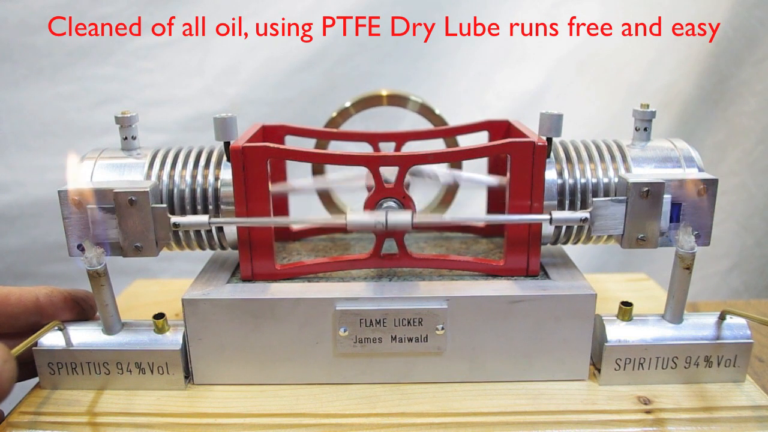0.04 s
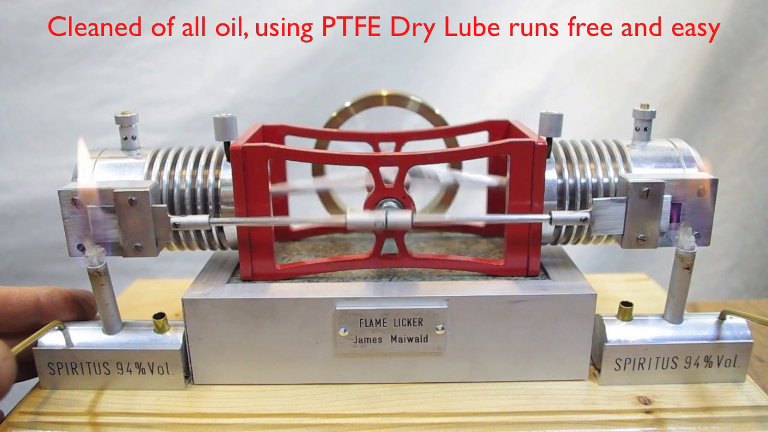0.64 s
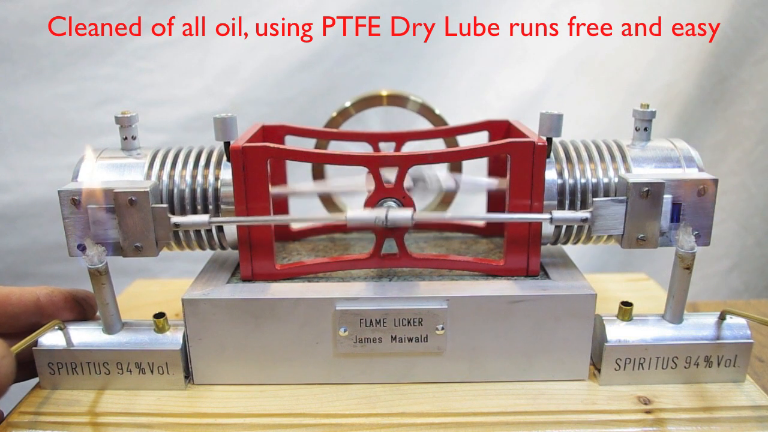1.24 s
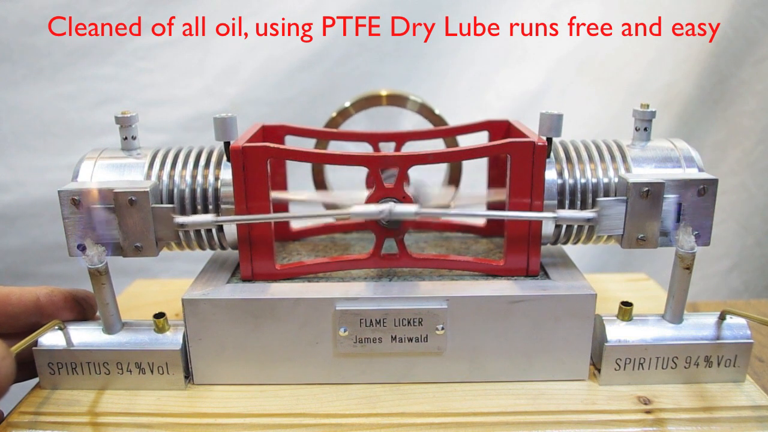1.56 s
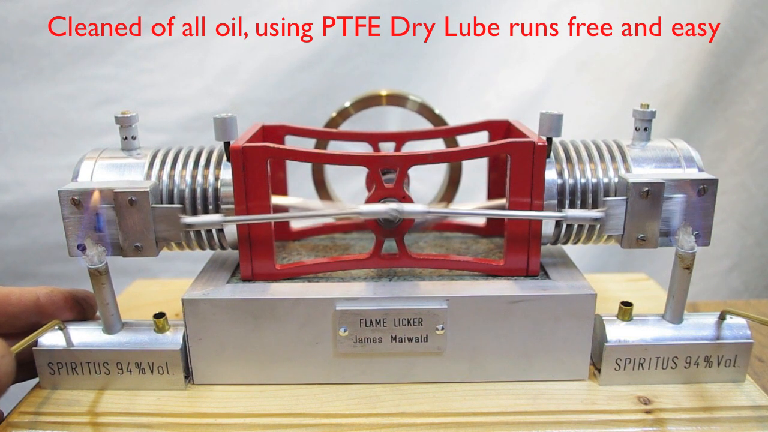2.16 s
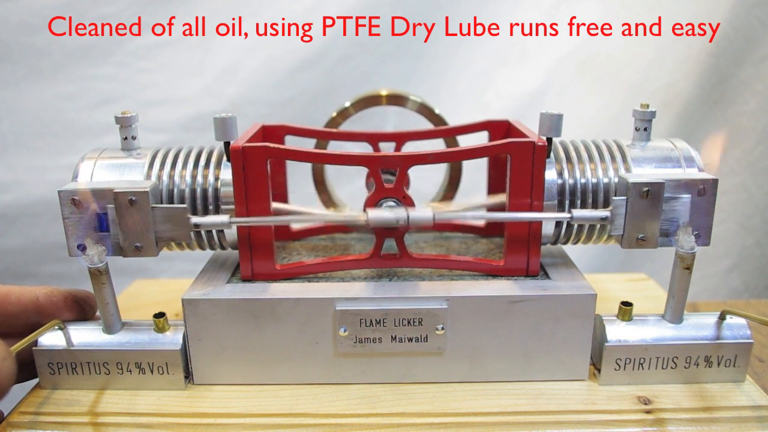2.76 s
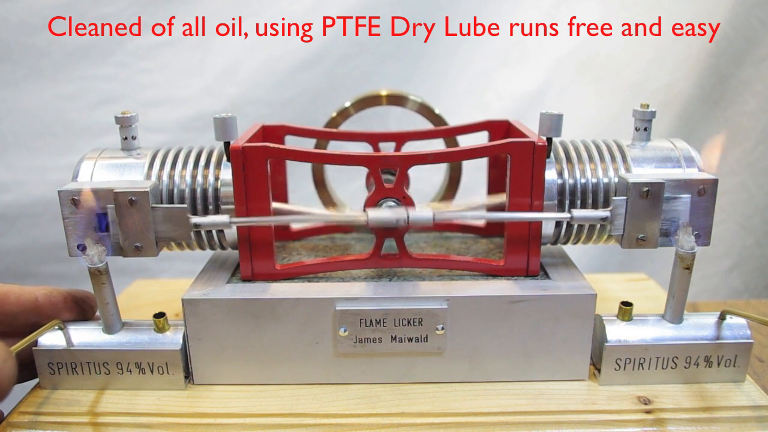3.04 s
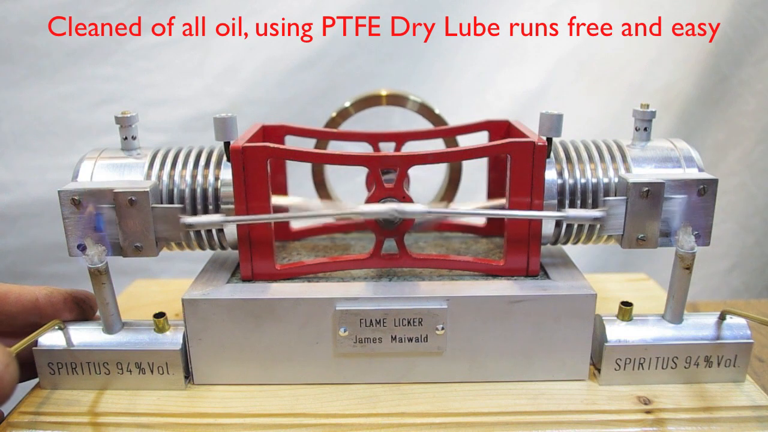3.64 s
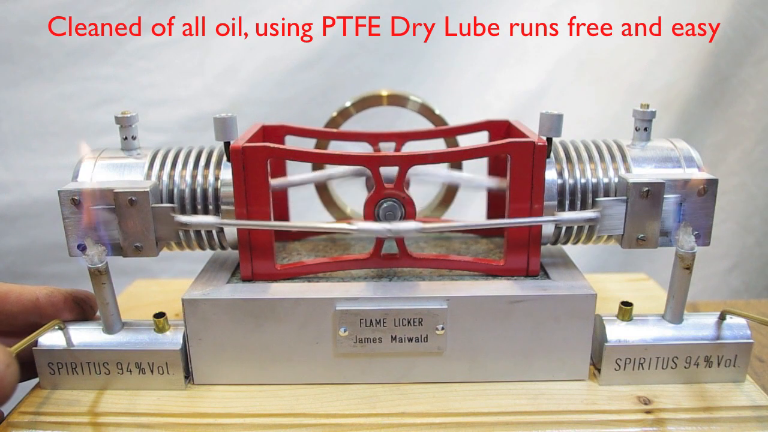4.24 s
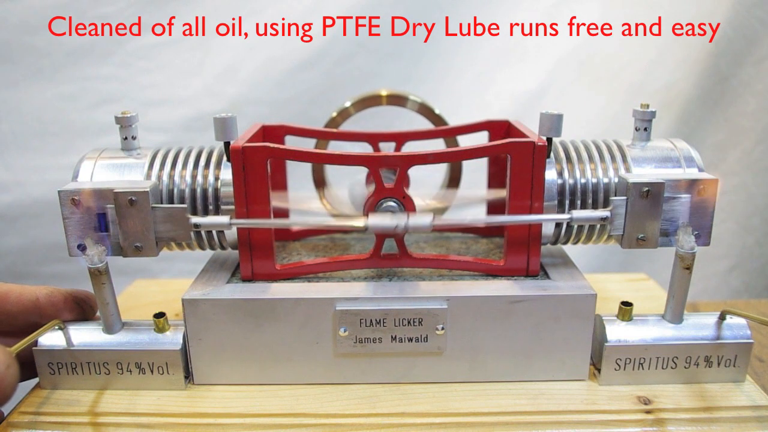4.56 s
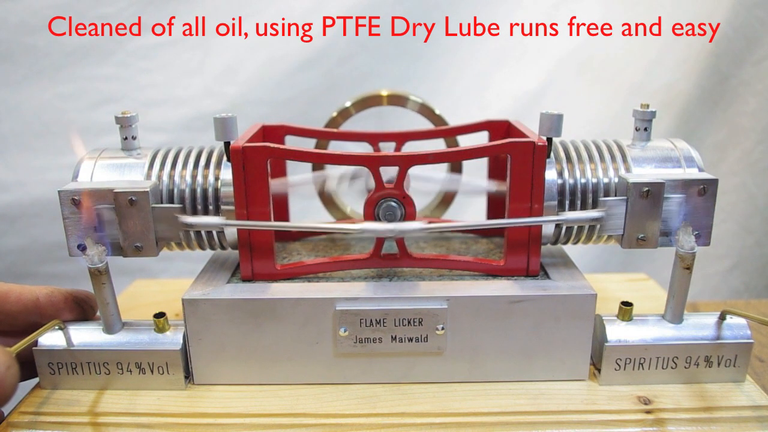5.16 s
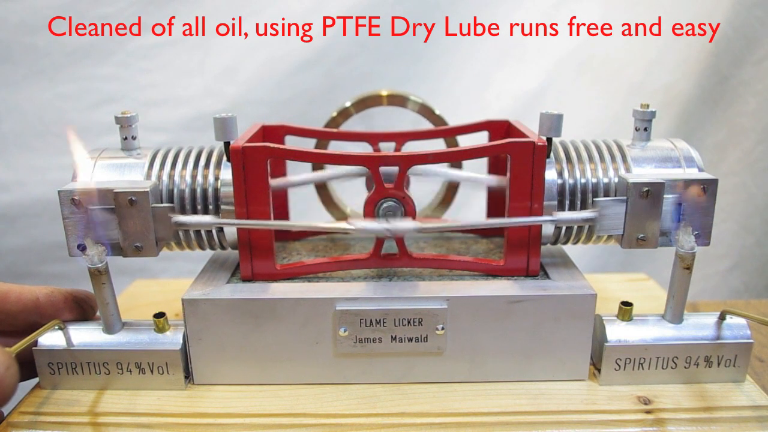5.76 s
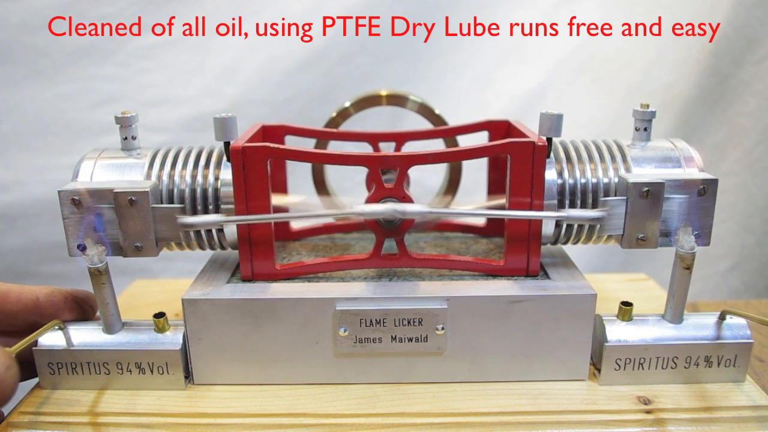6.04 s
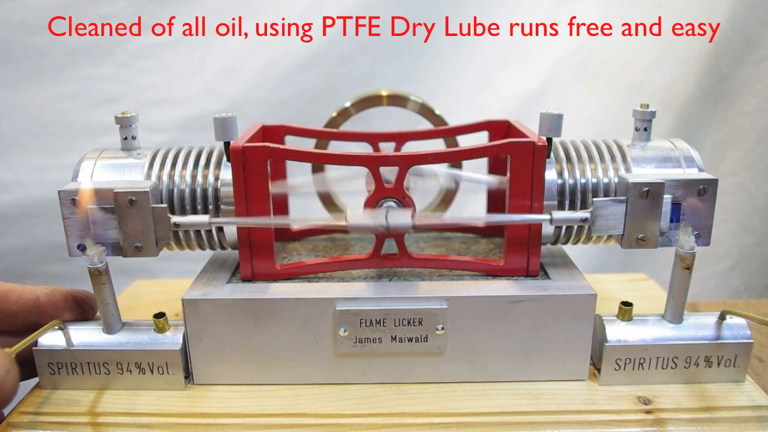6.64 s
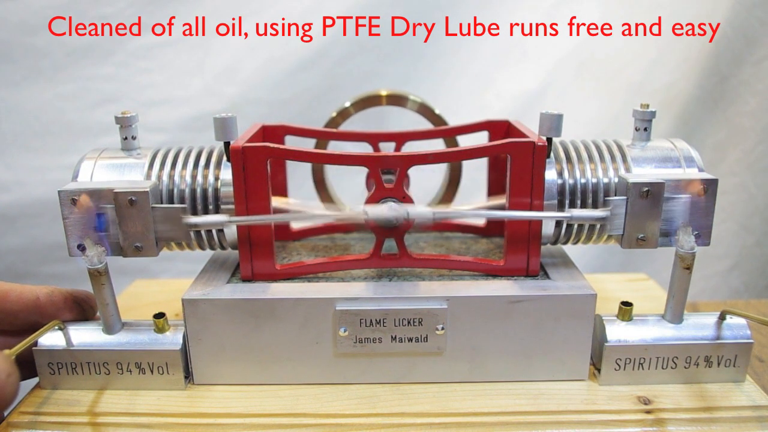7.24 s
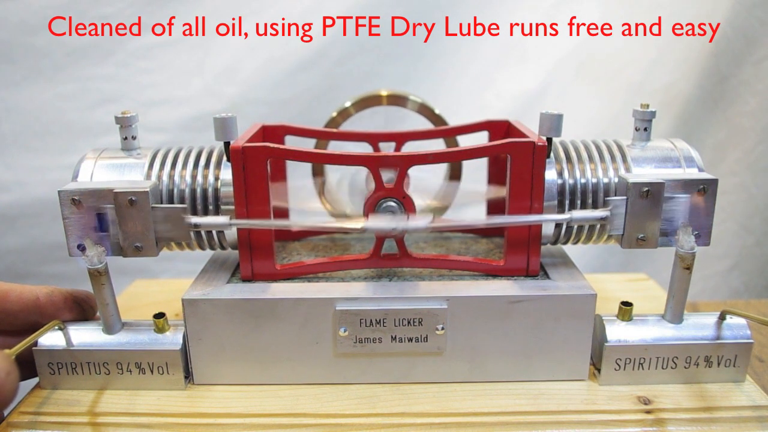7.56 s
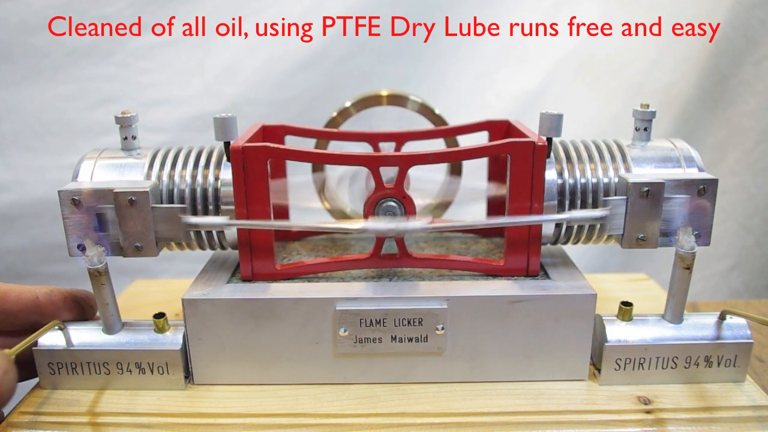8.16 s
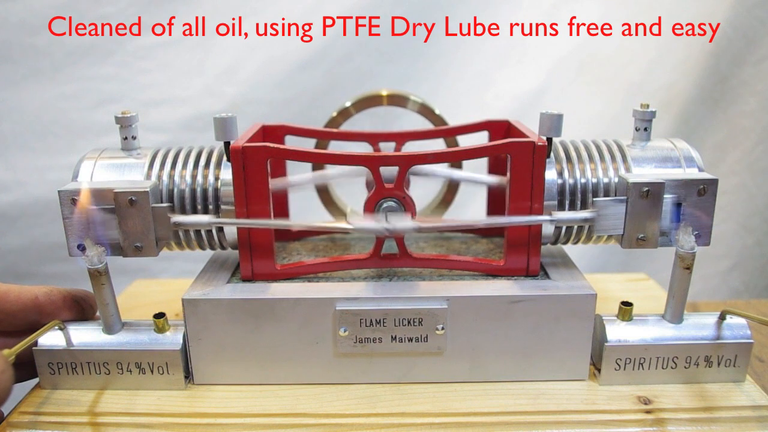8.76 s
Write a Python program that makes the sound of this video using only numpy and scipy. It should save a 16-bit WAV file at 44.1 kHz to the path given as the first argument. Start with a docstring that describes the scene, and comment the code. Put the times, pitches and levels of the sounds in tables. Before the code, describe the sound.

Rapid metal clacks and ticks come from a little flame-driven engine nearby in a small room. While it turns slowly, a dry sliding part chirps once each turn and the wooden board drums softly beneath it. The engine then accelerates to about twice its slowest pace, losing the squeak and gaining a light hollow knock. Soft rubbing and a low, steady rush lie under the clatter.

```python
"""A model flame-licker engine

A two-cylinder engine on a wooden board in a small room speeds up from three to six turns a second.
Valves and linkage clack four times a turn; each impact excites the modes of the metal frame.
Dry sliding parts rub at fixed crank angles, and at low speed one squeaks by stick-slip once a turn.
At higher speed a hollow knock comes just ahead of one clack. Flames and bearings rush underneath."""
import sys
import numpy as np
from scipy import signal
from scipy.fft import rfft, irfft, next_fast_len
from scipy.io import wavfile
from scipy.ndimage import uniform_filter1d

SR = 44100
rng = np.random.default_rng(int(sys.argv[2]) if len(sys.argv) > 2 else 0)


def transcribe(signal):
    """Save signal, clipped to [-1, 1], as a 16-bit WAV file at the path in sys.argv[1]."""
    frames = np.atleast_2d(signal).T
    limited = np.clip(frames, -1, 1)
    pcm = np.round(limited * 32767).astype(np.int16)
    wavfile.write(sys.argv[1], SR, pcm)


N = 387638
TIME = np.arange(N) / SR

# Spectrum of flames and bearings. Each row: frequency in Hz, relative spectral density in dB.
RUSH_SPECTRUM = [(18, -51), (30, -24), (181, 2), (247, 10), (354, 5.5), (965, -5.5), (1100, 0),
                 (1880, -3.5), (3070, -4), (4070, -9.5), (7170, -8), (8160, -3.5), (12000, -22),
                 (13000, -17), (14000, -25)]
# Reverberation of the room. Each row: frequency in Hz, 60 dB decay time in seconds, gain in dB.
ROOM_BANDS = [(101, 0.96, -4), (288, 0.31, -9.5), (1050, 0.57, -7), (2940, 0.15, -12.5),
              (7900, 0.22, -13.5), (14000, 0.19, -14)]
# Speed of the flywheel. Each row: time in seconds, turns per second.
FLYWHEEL_SPEED = [(0.0, 3.7788), (0.691, 3.2931), (1.19, 3.0997), (1.79, 2.9772), (2.615, 3.0968),
                  (3.534, 3.7625), (3.784, 3.702), (4.218, 4.0787), (5.527, 4.7922), (5.888, 5.1671),
                  (6.303, 5.6151), (6.553, 5.5964), (6.802, 5.7923), (7.114, 5.6919), (7.364, 5.9311),
                  (8.243, 6.4621), (8.54, 6.423), (8.79, 6.4827)]
# A turn has four strokes, 0 to 3, with one clack each.
# Each row: time in seconds, then the lag of clacks 0 to 3 behind their quarter turns in strokes.
VALVE_LAG = [(0.0, 0.063, 0.0, 0.163, -0.03), (2.8, 0.055, 0.0, 0.136, 0.109),
             (8.79, -0.05, 0.0, 0.084, -0.001)]
# Sliding contacts, grouped by stroke. Each row: centre after the clack and spread, both in strokes,
# frequency in Hz, bandwidth in Hz, level when slow in dB, level when fast in dB.
SLIDING_CONTACTS = [
    [(0.18, 0.19, 1580, 410, -33, -34.5), (0.15, 0.12, 8500, 2200, -37, -35),
     (0.17, 0.23, 5300, 1600, -47, -46)],
    [(0.86, 0.27, 1118, 190, -46.5, -38.5), (0.69, .6, 702, 30, -51, -51)],
    [(0.44, 0.19, 1557, 190, -36, -32), (0.45, 0.16, 3040, 220, -37, -32),
     (0.45, 0.1, 8400, 880, -34.5, -43), (0.34, 0.17, 5440, 1300, -38, -46)],
    [(0.48, .28, 880, 430, -37.5, -37.5), (0.24, 0.25, 2300, 380, -40, -38.5),
     (0.39, 0.21, 6050, 2300, -40.5, -38)],
]
# Squeaks after clack 2. Each row: time in seconds, delay in strokes, top pitch in Hz, level in dB.
SQUEAK_COURSE = [(0.2, 0.41, 2840, -30), (0.8, 0.49, 2820, -30), (1.1, 0.46, 2910, -18.5),
                 (1.45, 0.52, 3084, -16.5), (2.45, 0.53, 3135, -15), (3.05, 0.54, 3090, -23.5),
                 (3.6, 0.42, 2845, -28), (5.05, 0.37, 2930, -30), (5.9, 0.4, 3050, -41)]
# Contour of one squeak. Each row: turns from its peak, pitch ratio, relative level in dB.
SQUEAK_CONTOUR = [(-.095, .86, -30), (-.068, .87, -16), (-.048, .875, -11), (-.038, .89, -3.5),
                  (-.015, .95, -2.5), (.002, 1.01, 4), (.012, 0.99, 3.5), (0.021, .99, -14)]
# A weak squeak holds its pitch less well. Each row: level in dB, waver as a fraction of the pitch.
SQUEAK_JITTER = [(-30, .028), (-20, .013)]
# Low modes of the board. Each row: frequency in Hz, relative level in dB.
BOARD_MODES = [(246, -2), (291, -8)]
# Drumming of the board. Each row: time in seconds, level in dB.
BOARD_DRIVE = [(0, -35.5), (1, -33), (2, -35), (3, -34), (4, -31), (4.8, -31), (5.5, -39.5), (6.2, -48),
               (8.8, -41)]
# Taps of loose joints, grouped by stroke. Each row: lag when slow and when fast in ms,
# level when slow and when fast in dB, frequency in Hz, bandwidth in Hz.
JOINT_TAPS = [
    [(12, 21, -26, -49, 8400, 6400)],
    [],
    [(8, 10.5, -39, -35, 9700, 2420), (-3, -14.5, -34, -28.5, 7500, 4400)],
    [(8.5, 12.5, -33, -32, 7200, 7400), (-5.5, -3, -28, -37, 435, 500)],
]
# The knock ahead of clack 2. Each row: turns per second, lead in ms, level in dB.
KNOCK_BY_SPEED = [(3.7, 3.5, -30), (3.85, 5, -22), (4.2, 7.3, -20), (4.6, 7.9, -22), (6.3, 9, -23.5)]
# Modes of frame and board. Each row: frequency in Hz, 60 dB decay time in seconds, relative level in dB.
FRAME_MODES = [(139.8, .12, -32), (244.1, .15, -20.5), (289, 0.17, -22), (581.5, 0.12, -23.5),
               (697.5, 0.19, -24), (861, 0.09, -20), (1104, 0.04, -17.5), (1552, 0.12, -19.5),
               (1640, 0.082, -36), (2332, 0.043, -15.5), (2860, 0.043, -23), (3100, 0.046, -22),
               (3336, 0.02, -22), (6230, 0.035, -15), (7800, 0.05, -19), (8130, 0.12, -11),
               (8440, 0.049, -10), (12840, 0.028, -12)]
# Spectra of the clacks. Each row: frequency in Hz, then the relative level of clacks 0 to 3 in dB.
CLACK_SPECTRA = [(55, -20, -16, -22, -36), (117, -18.5, -13, -20.5, -37), (242, -15.5, -8, -9, -24),
                 (487, -3, -8.5, -7, -5), (860, -9, -7.5, -7.5, -11.5), (1480, -6.5, -5.5, -4.5, -8),
                 (2170, -8, -2.5, -10.5, -1.5), (3174, 1.5, -3, 1.5, -3.5), (4240, -9.5, -9.5, -13, -15.5),
                 (5260, -7, -3.5, -9, -3), (7590, -5.5, -4, -13.5, -8), (7630, 0.5, 1.5, -0.5, 1),
                 (10760, -8.5, -4, -8, -6), (13200, -20.5, -16, -14.5, -19), (14900, -15, -4.5, -48, -34)]
# The contact of each stroke. Each row: chatter time in ms, settling time in ms, relative levels of
# frame ring and rattling tail in dB, tail decay in ms, tick frequency in Hz, tick bandwidth in Hz.
CLACK_CONTACTS = [(2.75, 0.97, -0.5, -4.5, 9, 6000, 4100), (2.27, 1.1, -5, -5, 8.3, 6300, 4000),
                  (2.15, 1.14, -0.5, -5.5, 9.3, 5950, 4000), (2.1, 0.96, -1.5, -3.5, 13.4, 6100, 6800)]
# Force of the clacks, grouped by stroke. Each row: turns per second, level in dB, treble tilt in dB,
# lead of the tick in ms, tick level in dB.
CLACK_FORCE = [
    [(3.1, -16, -4, 15, -27), (4.1, -15, -0.5, 8, -25.5), (5.5, -18.5, 1.5, 8.5, -34),
     (6.3, -17, 0, 8, -25)],
    [(3.1, -14, -1.5, 2.8, -39), (4.3, -13.5, 0.5, 14, -29), (5.5, -16, 0.5, 8, -41),
     (6.3, -15, -2, 2.7, -39)],
    [(3.2, -18, -3, 2.2, -39), (3.7, -15.7, -2, 4.8, -23.5), (4.7, -15.5, 1, 8, -22.5),
     (6.3, -18, 1.5, 8, -24.5)],
    [(3.1, -18, 2, 5.7, -24), (4.2, -16.3, -2.5, 5.2, -25), (5.3, -19.5, 1.5, 3.2, -26),
     (6.3, -20.5, 3, 3, -33)],
]


def undb(db):
    """Amplitude ratio of a level in decibels."""
    return 10 ** (np.asarray(db) / 20)


def unit(x):
    """Normalisation to an rms of 1."""
    return x / np.sqrt(np.mean(x ** 2) + 1e-18)


def add(out, start_s, x):
    """Superposition of x on out from a given time."""
    i = int(round(start_s * SR))
    a, b = max(i, 0), min(i + len(x), N)
    if b > a:
        out[a:b] += x[a - i:b - i]


def lookup(table, at):
    """Linear interpolation of a table's other columns along its first."""
    first, *columns = np.transpose(table)
    return [np.interp(at, first, column) for column in columns]


def by_stroke(table):
    """Rows of a table grouped by stroke, each led by its stroke number."""
    return [(stroke, *row) for stroke, rows in enumerate(table) for row in rows]


def band(x, hz, width):
    """Two equal resonators in cascade pass a band with steep skirts."""
    hz = min(hz, SR / 2 - 2000)
    b, a = signal.iirpeak(hz, hz / min(1.5 * width, SR / 3), fs=SR)
    return signal.lfilter(b, a, signal.lfilter(b, a, x))


def colour(x, hz, db):
    """Minimum-phase filtering through (Hz, dB) points, by folding the cepstrum."""
    size = next_fast_len(2 * len(x)) // 2 * 2
    f = np.maximum(np.arange(size // 2 + 1) * SR / size, 1)
    cepstrum = irfft(np.log(undb(np.interp(np.log(f), np.log(hz), db))))
    cepstrum[1:size // 2] *= 2
    cepstrum[size // 2 + 1:] = 0
    return irfft(rfft(x, size) * np.exp(rfft(cepstrum)))[:len(x)]


def wander(rate_hz):
    """Smooth random fluctuation with an rms of 1."""
    step = max(int(SR / rate_hz), 1)
    stairs = np.repeat(rng.standard_normal(N // step + 1), step)
    return unit(uniform_filter1d(stairs, step)[:N])


def chatter(noise, hold_ms, settle_ms):
    """Contact chatter: metal parts buzz together for a moment, then settle exponentially."""
    ms = 1000 * np.arange(len(noise)) / SR
    return noise * np.exp(-np.maximum(ms - hold_ms, 0) / settle_ms)


def blow(x, db):
    """A transient scaled to the energy of 3 ms of steady sound at this level."""
    return x * undb(db) * np.sqrt(.003 * SR / np.sum(x ** 2))


def flames_and_bearings(level_db=-44.5, flicker_db=2.0, drone_db=-62):
    """Flames and bearings give flickering broadband noise over a narrow resonance of the board."""
    rush = unit(colour(rng.standard_normal(N), *np.transpose(RUSH_SPECTRUM)))
    rush *= undb(level_db + flicker_db * wander(25))
    drone = unit(band(rng.standard_normal(N), hz=98, width=12))
    return rush + undb(drone_db) * drone


def room(x, onset_s=0.0093, size=16384):
    """Reverberation: reflections from near walls merge into a diffuse tail that decays band by band."""
    t = np.arange(size) / SR
    hz, t60, db = np.transpose(ROOM_BANDS)
    log_f = np.log(np.maximum(np.arange(size // 2 + 1) * SR / size, 1))
    response = 0
    for k, share in enumerate(np.eye(len(hz))):
        band_gain = np.sqrt(np.interp(log_f, np.log(hz), share))
        noise = irfft(rfft(rng.standard_normal(size)) * band_gain)
        fade = undb(-60 * t / t60[k]) * (1 - np.exp(-(t / onset_s) ** 2))
        response = response + undb(db[k]) * noise * fade / np.sqrt(np.sum(fade ** 2))
    return signal.fftconvolve(x, response)[:N]


def crank_window(angle, centre, spread):
    """A Gaussian swell once a turn; angles are counted in strokes."""
    offset = (angle - centre + 2) % 4 - 2
    return np.exp(-.5 * (offset / spread) ** 2)


def swish(angle, pace, start_hz=7000, end_hz=5000, centre=1.63, spread=0.143, slow_db=-44, fast_db=-46):
    """Light friction: after clack 1 a slide brushes with a faint, falling band of noise."""
    travel = np.clip((angle % 4 - centre) / (3 * spread) + .5, 0, 1)
    phase = 2 * np.pi * np.cumsum(start_hz + travel * (end_hz - start_hz)) / SR
    whistle = unit(wander(1600) * np.sin(phase) + wander(1600) * np.cos(phase))
    return whistle * crank_window(angle, centre, spread) * undb(slow_db + pace * (fast_db - slow_db))


def rubs(angle, pace, grain_db=4, patchy_db=1.3):
    """Sliding friction: dry faces scrape in fine grains and uneven patches over part of each turn."""
    out = np.zeros(N)
    for stroke, centre, spread, hz, width, slow_db, fast_db in by_stroke(SLIDING_CONTACTS):
        grains = rng.standard_normal(N) * undb(grain_db * wander(1100) + patchy_db * wander(90))
        window = crank_window(angle, stroke + centre, spread)
        out += unit(band(grains, hz, width)) * window * undb(slow_db + pace * (fast_db - slow_db))
    return out


def squeaks(times, speed, rough_db=0.5, overtone_db=-30):
    """Stick-slip oscillation: a dry slide gives a rising squeak once a turn, until it runs free."""
    out, wobble, grit = np.zeros(N), wander(500), wander(400)
    turns, ratio, contour_db = np.transpose(SQUEAK_CONTOUR)
    for start in times[2::4]:
        if start > SQUEAK_COURSE[-1][0]:
            break
        delay, top_hz, db = lookup(SQUEAK_COURSE, start)
        waver, = lookup(SQUEAK_JITTER, db)
        from_peak = (TIME - start) * speed[int(start * SR)] - delay / 4  # in turns
        on = (from_peak > turns[0]) & (from_peak < turns[-1])
        hz = top_hz * np.interp(from_peak[on], turns, ratio) * (1 + waver * wobble[on])
        phase = 2 * np.pi * np.cumsum(hz) / SR
        gain = undb(db + np.interp(from_peak[on], turns, contour_db) + rough_db * grit[on])
        out[on] += gain * (np.sin(phase) + undb(overtone_db) * np.sin(2 * phase))
    return out


def board_drumming(times, swell_s=0.023, sharpness=2.5, detune=0.021, scatter_db=1, size=6000):
    """Structure-borne sound: after clack 3 the engine shudders and two board modes swell and fade."""
    out, t = np.zeros(N), np.arange(size) / SR
    swell = (t / swell_s * np.exp(1 - t / swell_s)) ** sharpness
    for start in times[3::4]:
        drive_db, = lookup(BOARD_DRIVE, start)
        for hz, db in BOARD_MODES:
            drift, phase, force = rng.standard_normal(3)
            ring = np.sin(2 * np.pi * (hz * (1 + detune * drift) * t + phase))
            add(out, start, undb(db + scatter_db * force + drive_db) * swell * ring)
    return out


def joint_taps(times, pace, scatter_db=3.0, scatter_ms=1.2, size=900):
    """Backlash: loose joints bounce lightly just before or after a clack."""
    out = np.zeros(N)
    for stroke, slow_ms, fast_ms, slow_db, fast_db, hz, width in by_stroke(JOINT_TAPS):
        for start in times[stroke::4]:
            pace_now = np.interp(start, TIME, pace)
            late, force = rng.standard_normal(2)
            lag_ms = slow_ms + pace_now * (fast_ms - slow_ms) + scatter_ms * late
            db = slow_db + pace_now * (fast_db - slow_db) + scatter_db * force
            tap = band(chatter(rng.standard_normal(size), hold_ms=1.8, settle_ms=1.9), hz, width)
            add(out, start + lag_ms / 1000, blow(tap, db))
    return out


def knocks(times, speed, ring_db=-7, scatter_db=1.3, size=4000):
    """Resonance: at speed a valve lands early, and its hollow knock rings on in the frame."""
    out = np.zeros(N)
    for start in times[2::4]:
        push = chatter(rng.standard_normal(size), hold_ms=2.7, settle_ms=0.78)
        force, rate = rng.standard_normal(), speed[int(start * SR)]
        if rate > KNOCK_BY_SPEED[0][0]:
            lead_ms, db = lookup(KNOCK_BY_SPEED, rate)
            knock = blow(band(push, hz=1530, width=340), db)
            ring = blow(band(push, hz=1547, width=43.4), db + ring_db)
            add(out, start - lead_ms / 1000, (knock + ring) * undb(scatter_db * force))
    return out


def frame_ring(t, scatter_db=2.0, detune=0.0052, build_cycles=3):
    """Free vibration: a struck frame rings in damped modes, the lowest building up most slowly."""
    hz, t60, db = np.transpose(FRAME_MODES)[:, :, None]
    drift, force, phase = rng.standard_normal((3, len(FRAME_MODES), 1))
    fade = undb(-60 * t / t60) * (1 - np.exp(-t * hz / build_cycles))
    energy = np.sum(fade ** 2, axis=1, keepdims=True) / (.006 * SR)  # relative to 6 ms at full level
    fade *= undb(db + scatter_db * force) / np.sqrt(energy)
    return np.sum(fade * np.sin(2 * np.pi * (hz * (1 + detune * drift) * t + phase)), axis=0)


def clack_times(speed, start_strokes=-0.433):
    """Crank angle is the integral of speed; a clack falls each quarter turn, shifted by valve timing."""
    crank = start_strokes + 4 * np.cumsum(speed) / SR
    valves = [crank - lag for lag in lookup(VALVE_LAG, TIME)]
    samples = [np.searchsorted(valves[n % 4][:-1], n) for n in range(int(crank[-1]) + 1)]
    return TIME[samples]


def clacks(times, speed, alike=0.37, clack_db=.5, scatter_db=0.85, treble_scatter_db=1.5,
           tick_scatter_db=2, lead_scatter=.08, size=6000):
    """Impact: a tick takes up the play, then the parts collide, chatter, rattle and ring the frame."""
    out, t = np.zeros(N), np.arange(size) / SR
    hz, *spectra = np.transpose(CLACK_SPECTRA)
    tilt_shape = np.clip(np.log2(hz / 4500), -.5, .5)  # a one-octave ramp centred on 4500 Hz
    faces = rng.standard_normal((4, size))  # the same faces meet on every turn
    for n, start in enumerate(times):
        stroke = n % 4
        hold_ms, settle_ms, ring_db, tail_db, tail_ms, tick_hz, tick_width = CLACK_CONTACTS[stroke]
        db, treble_db, lead_ms, tick_db = lookup(CLACK_FORCE[stroke], speed[int(start * SR)])
        force, edge, play, nudge = rng.standard_normal(4)
        db += scatter_db * force
        fresh, rattle, touch = rng.standard_normal((3, size))
        tick = band(chatter(touch, hold_ms=1.1, settle_ms=3.7), tick_hz, tick_width)
        lead_s = lead_ms * (1 + lead_scatter * play) / 1000
        add(out, start - lead_s, blow(tick, tick_db + tick_scatter_db * nudge))
        strike = chatter(np.tanh(fresh + alike * faces[stroke]), hold_ms, settle_ms)
        hit = blow(strike, 0) + blow(chatter(rattle, 0, tail_ms), tail_db)
        tilt = (treble_db + treble_scatter_db * edge) * tilt_shape
        add(out, start, blow(colour(hit, hz, spectra[stroke] + tilt), db + clack_db))
        add(out, start, undb(db + ring_db) * frame_ring(t))
    return out


def scene():
    """Superposition: impacts and friction timed by the flywheel, their reverberation, and the rush."""
    speed, = lookup(FLYWHEEL_SPEED, TIME)
    times = clack_times(speed)
    padded_times = np.r_[2 * times[0] - times[1], times, 2 * times[-1] - times[-2]]
    angle = np.interp(TIME, padded_times, np.arange(-1, len(times) + 1))  # in strokes; clack n falls at n
    pace = np.clip((speed - 3.2) / 1.9, 0, 1)  # 0 when slow, 1 when fast
    impacts = clacks(times, speed) + joint_taps(times, pace) + knocks(times, speed)
    engine = impacts + board_drumming(times)
    engine += rubs(angle, pace) + swish(angle, pace) + squeaks(times, speed)
    return (engine + room(engine) + flames_and_bearings())[None]


def record(dry, ceiling=0.84, bass_hz=90, top_hz=13600):
    """Band limiting and soft saturation thin the deep bass, round the loudest peaks and cut the top."""
    thin = signal.sosfilt(signal.butter(2, bass_hz, "highpass", fs=SR, output="sos"), dry)
    rounded = thin / (1 + (thin / ceiling) ** 4) ** .25
    return signal.sosfilt(signal.cheby1(8, .3, top_hz, fs=SR, output="sos"), rounded)


dry = scene()
out = record(dry)
transcribe(out)
```